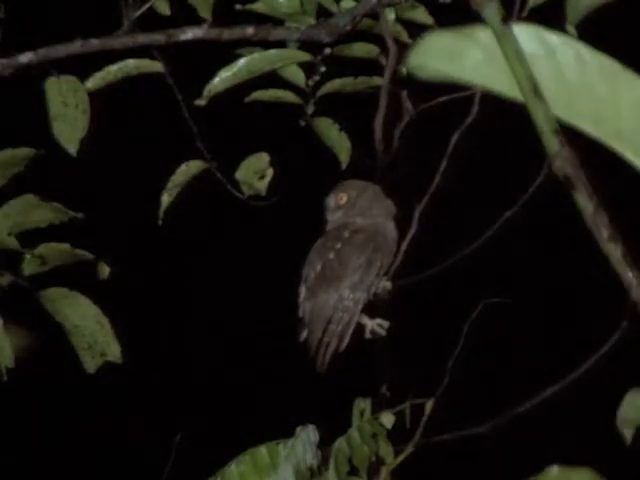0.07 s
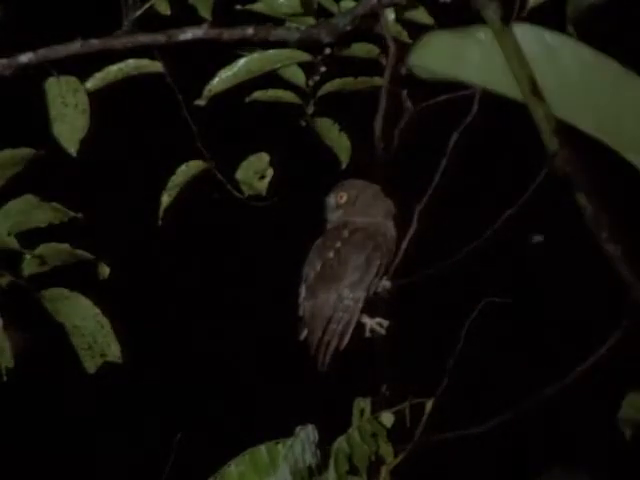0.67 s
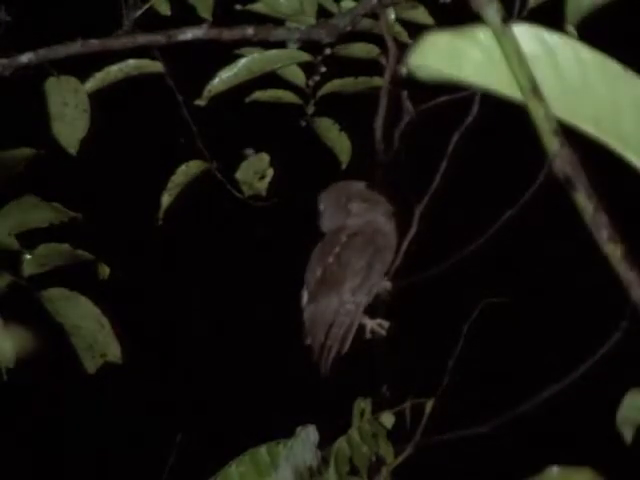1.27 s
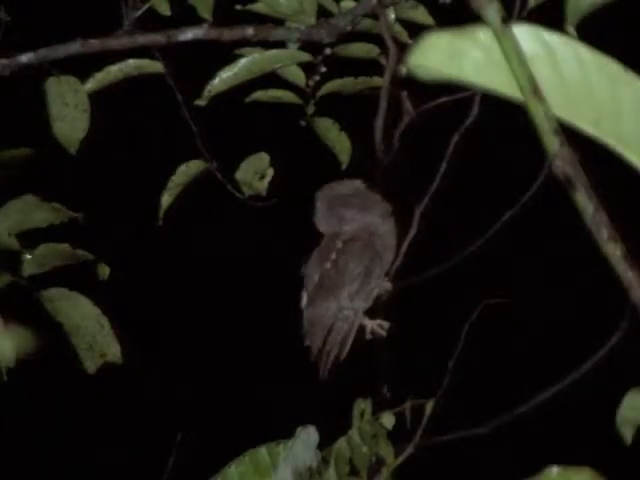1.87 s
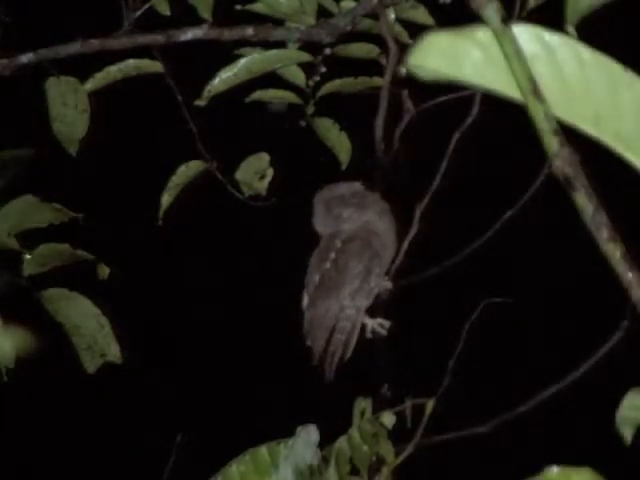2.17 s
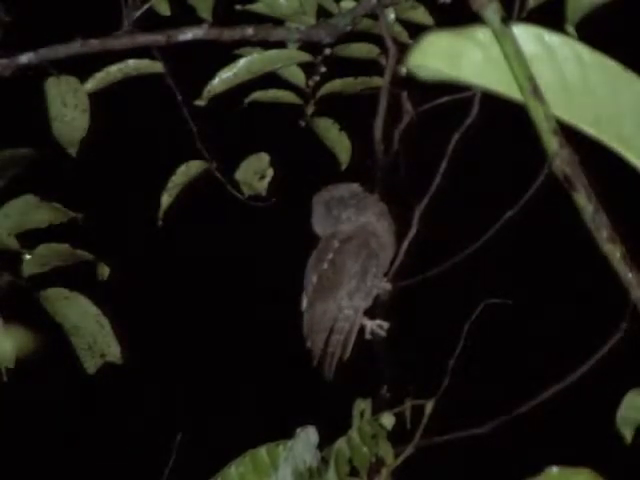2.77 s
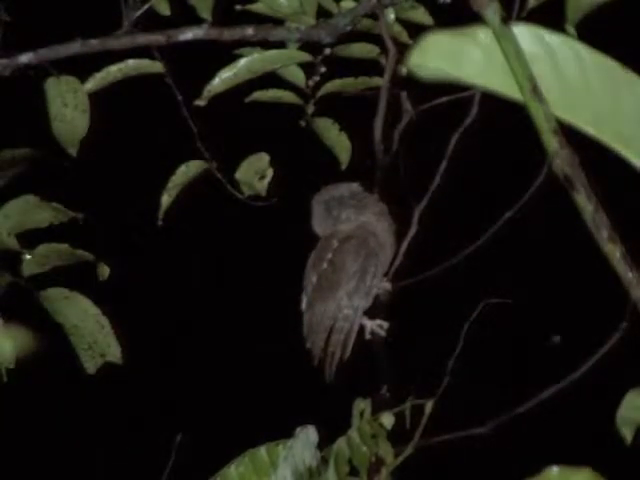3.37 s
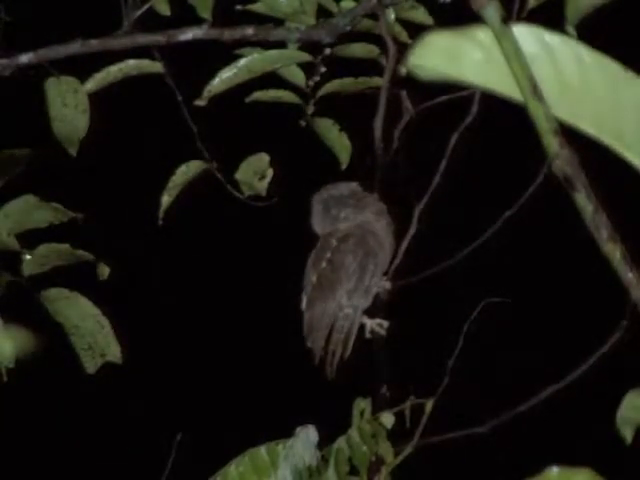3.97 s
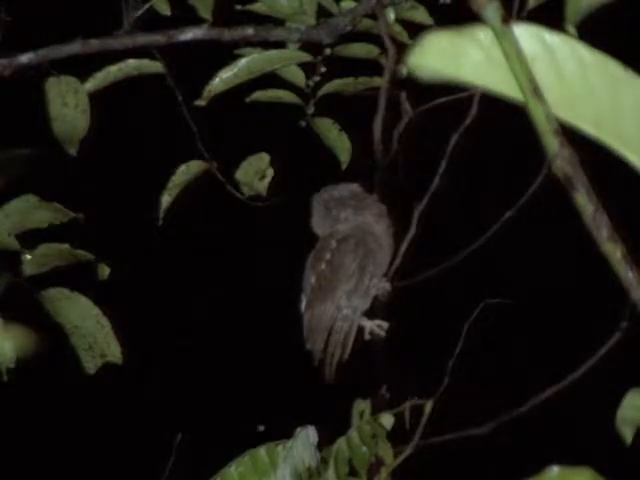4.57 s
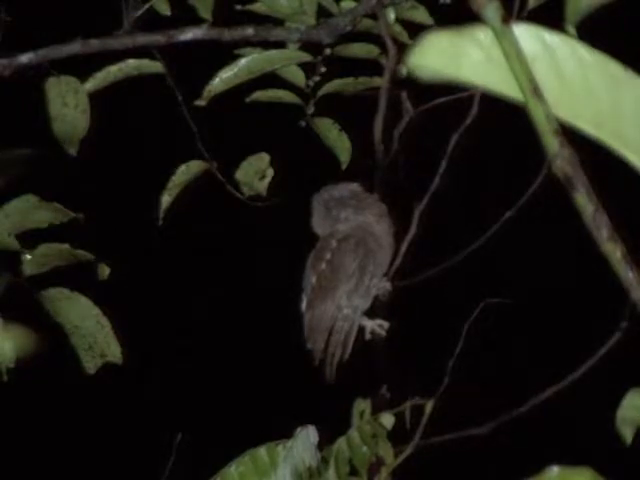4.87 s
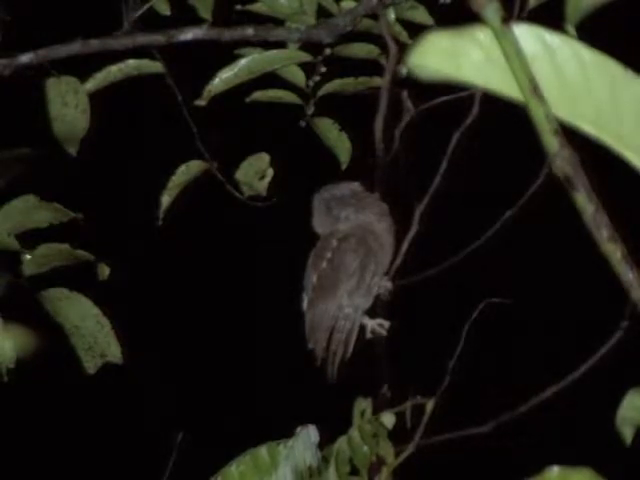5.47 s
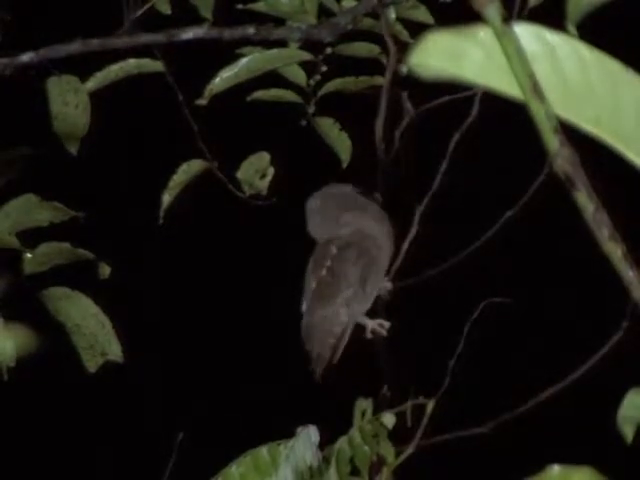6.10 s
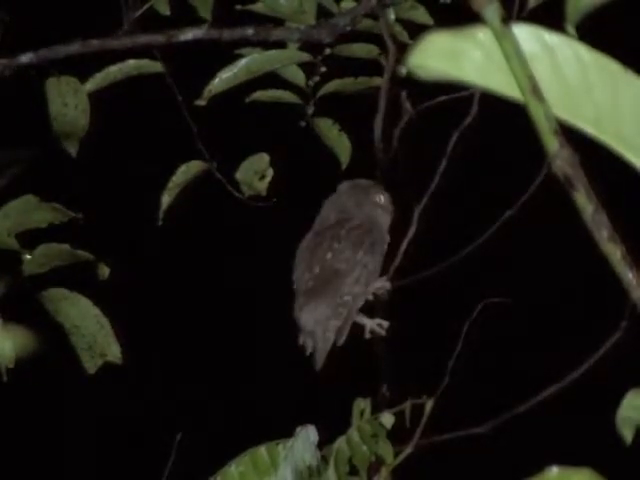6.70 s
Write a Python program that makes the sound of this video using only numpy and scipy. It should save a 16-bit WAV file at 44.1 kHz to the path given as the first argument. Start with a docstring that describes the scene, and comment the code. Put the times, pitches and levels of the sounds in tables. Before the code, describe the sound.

Night in a forest, with crickets trilling steadily on all sides of the microphone, higher crickets pulsing about twice a second and katydids buzzing above them. Thin tree cricket whistles come and go. Early on come a brief twig creak and two soft, distant animal calls; later a third call and a few dry twig ticks. Underneath lie a faint machine hum and a low distant rumble that grows a little toward the end.

```python
"""A forest at night. From the start, insects rub file on scraper to ring their wings: crickets trill near
5 kHz, higher ones purr in phrases near 7 kHz and katydids buzz near 9 kHz, over countless far neighbours,
a distant rumble and a faint machine hum. Soon leaves stir and tree crickets whistle on and off. A twig
creaks at 0.9 s, and a far animal calls softly at 1.5 s, 1.9 s and 4.8 s. From 4.7 s a few ticks sound in
the foliage, while the upper part of the rumble swells to a peak at 6.3 s."""
import sys
import numpy as np
from scipy import signal
from scipy.fft import rfft, irfft
from scipy.io import wavfile
from scipy.ndimage import uniform_filter1d

SR = 44100
rng = np.random.default_rng(int(sys.argv[2]) if len(sys.argv) > 2 else 0)


def wrap_up_sound(samples):
    """Save the sound to the file named by the first command line argument, as 16-bit audio."""
    columns = np.atleast_2d(samples).T
    # keep every value between -1 and 1, then stretch to whole-number steps
    tamed = np.clip(columns, -1, 1)
    steps = np.round(tamed * 32767).astype(np.int16)
    wavfile.write(sys.argv[1], SR, steps)


N = 297234

# spectra of the rumble, its swelling upper part and the leaves: (frequency [Hz], relative density [dB])
RUMBLE_SPECTRUM = [(20, -16), (42, -33), (65, -8), (110, -3.5), (150, 2.5), (185, -0.5), (270, -9),
                   (500, -13.5), (620, -11), (700, -16), (1400, -22.5), (3000, -30), (6500, -20),
                   (10500, -56), (12500, -70)]
SWELL_SPECTRUM = [(70, -25), (120, 17), (200, 11), (240, 16), (290, 13), (380, -55)]
LEAF_SPECTRUM = [(400, 8), (800, 5), (1300, 4.5), (2000, 4), (3000, -0.5), (5000, -14), (9000, -48)]
# likeness of the rumble at the two ears: (frequency [Hz], coherence [0-1])
RUMBLE_COHERENCE = [(60, 0.74), (170, 0.51), (300, 0.088), (600, 0.09), (1200, 0.027), (3000, 0.15),
                    (10000, .15)]
# balance of the rumble: (frequency [Hz], left minus right [dB])
RUMBLE_BALANCE = [(40, -1), (80, 10), (160, 3.5), (300, 0), (600, -2), (1200, -1.5), (3000, 1.5)]
# phase of the rumble between the ears: (frequency [Hz], lead of the left ear [rad])
RUMBLE_PHASE = [(40, 0.78), (130, 0.52), (260, -0.94), (950, -1.34), (1900, 0.037), (4000, -0.79)]
# tones of a far machine, and steady narrow lines within the cricket trills: (frequency [Hz], level [dB], left
# minus right [dB])
HUM_TONES = [(61.3, -73.5, 23), (74.7, -70.5, 14), (144.3, -64.5, 6), (363.4, -72, 5), (499, -74, -14),
             (595, -77, -7), (630, -66.5, -18)]
TRILL_LINES = [(4572, -64, -4), (4812, -54.5, -3.5), (4846, -59, 4), (4948, -58, 0), (5125, -55.5, 3),
               (5322, -56, 4), (5425, -55.5, 6), (5499, -59, 0), (5633, -60, -1), (5654, -62, 8),
               (5751, -63.5, -1)]
# rustles of leaves: (centre time [s], half length [s], relative level [dB])
LEAF_RUSTLES = [(0.362, 0.031, -66), (0.65, 0.34, -64.5), (0.666, 0.0051, -65), (0.922, 0.018, -60.5),
                (1.402, 0.12, -62.5), (1.72, 0.074, -66), (2.307, 0.28, -61), (2.47, 0.017, -72),
                (2.74, 0.04, -69), (3.498, 0.072, -62), (4.28, 0.034, -75), (4.76, 0.089, -60.5),
                (5.93, .04, -67), (6.42, 0.014, -60)]
# resonances of the creaking twig: (frequency [Hz], relative level [dB])
CREAK_MODES = [(1080, -8), (1490, 0), (1860, -8), (2450, -21)]
# its slips: (centre time [s], half length [s], pitch factor [ratio], level [dB])
CREAK_SLIPS = [(.903, .007, .99, -53), (.918, .006, .9, -53), (.935, .008, 1.01, -49.5)]
# resonances of a snapping twig: (frequency [Hz], bandwidth [Hz], relative level [dB])
TWIG_MODES = [(600, 400, -14), (1090, 430, -6), (1700, 430, -8), (2780, 420, -3), (3880, 900, -11)]
# snaps: (time [s], level [dB], ring frequency [Hz], time to decay by 60 dB [s], left minus right [dB])
TWIG_SNAPS = [(4.691, -38, 930, .024, 10), (4.742, -37, 1250, .016, 6), (5.158, -44, 1500, .016, -8),
              (5.162, -32.5, 2990, .024, 10), (5.165, -38, 1080, .02, 8), (5.175, -44, 1700, .016, 8),
              (5.932, -49, 2480, .03, -3), (6.414, -50, 1500, .03, -3)]
# calls of a far animal: (centre time [s], half length [s], pitch [Hz], glide [Hz/s], level [dB])
ANIMAL_CALLS = [(1.48, 0.1, 1262, -60, -57.5), (1.88, .17, 1275, 0, -65), (4.84, .1, 1335, 120, -57)]
# tree cricket notes: (start [s], end [s], pitch [Hz], level [dB], left minus right [dB])
TREE_CRICKET_NOTES = [(.8, 3.2, 3763, -68, 3), (.4, 3.1, 3806, -70.5, 3), (1.9, 3.2, 3994, -74, 2),
                      (1.6, 3.1, 4269, -66, 2), (1.7, 3.4, 4224, -68, 2), (2.1, 2.8, 4352, -66, 2),
                      (3.4, 4.7, 3915, -71, 2), (3.45, 4.35, 3994, -68.5, 2), (3.5, 4.4, 4272, -70, 2),
                      (3.5, 4.4, 4355, -69, 2), (5.4, 6.7, 3763, -67, 4), (5.6, 7, 3806, -72, 3)]
# spectra of the far insect choirs: (frequency [Hz], relative density [dB])
KATYDID_SPECTRUM = [(6800, -27), (7600, -18.5), (8150, -9.5), (8450, -0.5), (9050, 1), (9450, 1),
                    (9950, -9.5), (10400, -12), (10900, -16.5), (11400, -25), (12000, -84)]
TRILL_SPECTRUM = [(3300, -29), (3800, -20.5), (4150, -19.5), (4550, -11.5), (4850, -3.5), (5150, -1),
                  (5400, 1), (5600, -8), (5800, -9.5), (6000, -17.5), (6300, -26), (6700, -34), (8000, -83)]
HIGH_SPECTRUM = [(5000, -63), (6200, -33), (6500, -16), (6680, -7), (6790, 0), (6850, 2), (6910, 9.5),
                 (7030, 9), (7120, 12), (7220, -13), (7300, -7), (7350, -13), (7500, -21), (7900, -22),
                 (9000, -80)]
# single insects: (wing resonance [Hz], stroke rate [1/s], rise time constant [s], relative level [dB],
# left minus right [dB], rms phase slip of a stroke [cycles])
KATYDID_WINGS = [(9070, 171, 0.00061, -50.5, 4.3, 0.46), (9360, 210, 0.00053, -58, 2.9, 0.17)]
TRILL_WINGS = [(4932, 119.8, .0009, -47.5, -3, .015), (5308, 115.7, .0005, -44.5, 4, .015),
               (5162.5, 117.6, .001, -46.5, 3, .02), (5070, 141, .0014, -51, -3, .04),
               (5184, 148, .001, -48.5, -2, .05), (5028, 104, .0014, -49.5, -1.5, .02),
               (5517, 116.8, .0008, -53, -2, .02), (5364, 126, .0009, -52, -1, .12),
               (5083, 133, .0012, -50.5, -3, .03)]
NEIGHBOUR_WINGS = [(7005, 44.5, .002, -46, 2, .3), (6895, 51, .0025, -46.5, 1, .25)]
HIGH_WINGS = [(7042, 46.8, .0032, -38, 3, .15), (7148, 48.2, .0036, -37.6, -.5, .11),
              (7268, 43, .004, -48.5, 7, .3)]
# phrases of the three high crickets, one list each: (start [s], end [s])
HIGH_PHRASE_TIMES = [
    [(-.1, .31), (.43, .88), (1.02, 1.38), (1.56, 1.95), (2.08, 2.52), (2.7, 3.06), (3.25, 3.68),
     (3.93, 4.42), (4.53, 5.06), (5.19, 5.67), (5.77, 6.2), (6.3, 6.85)],
    [(.04, .45), (.61, 1.02), (1.15, 1.45), (1.56, 1.96), (2.11, 2.5), (2.66, 3.0), (3.19, 3.61),
     (3.76, 4.14), (4.29, 4.66), (4.8, 5.2), (5.37, 5.77), (5.92, 6.3), (6.46, 6.85)],
    [(-.1, .2), (.31, .64), (.83, 1.17), (1.32, 1.68), (1.83, 2.17), (2.35, 2.7), (2.87, 3.2), (3.4, 3.72),
     (3.89, 4.25), (4.41, 4.74), (4.94, 5.28), (5.42, 5.75), (5.97, 6.31), (6.47, 6.85)],
]

RUMBLE_DB, RUMBLE_RISE_DB_PER_S = -46.5, 0.2056
SWELL_PEAK_S, SWELL_HALF_S, SWELL_DB = 6.27, 1.18, -55
CREAK_WIDTH_HZ, RING_OVER_CRACK_DB = 110, -2
CALL_WANDER_HZ, CALL_WET_DB = 46.1, -1
PHRASE_FADE_S, PHRASE_ARCH_HZ = 0.059, 24
CUTOFF_HZ = 14600


def amp(db):
    """Amplitude ratio of a level in decibels."""
    return 10 ** (np.asarray(db) / 20)


def unit_rms(x):
    """Normalisation to an rms of 1."""
    return x / np.sqrt(np.mean(x ** 2) + 1e-20)


def log_interp(points, hz):
    """Interpolation of a table on a log-frequency axis."""
    f, value = np.transpose(points)
    return np.interp(np.log(hz + 1), np.log(f + 1), value)


def pan(db):
    """Left and right gains for an interaural level difference."""
    return amp(np.array([[.5], [-.5]]) * db)


def bell(centre_s, half_s):
    """Gaussian envelope of height 1."""
    return np.exp(-((np.arange(N) / SR - centre_s) / half_s) ** 2 / 2)


def drift(rate_hz):
    """Random fluctuation: low-passed noise of rms 1."""
    hz = np.fft.rfftfreq(N, 1 / SR)
    return unit_rms(irfft(rfft(rng.standard_normal(N)) * np.exp(-(hz / rate_hz) ** 2), N))


def cycles(hz):
    """Phase in cycles: the integral of frequency, from a random start."""
    return np.cumsum(hz) / SR + rng.random()


def resonance(hz, centre_hz, width_hz):
    """Lorentzian response of a damped mode."""
    return 1 / (1 + (2 * (hz - centre_hz) / width_hz) ** 2)


def diffuse(spectrum, coherence, pan_db, lead_rad=0, ragged_db=0):
    """Superposition: countless far sources sum to noise that is partly coherent between the ears."""
    hz = np.fft.rfftfreq(N, 1 / SR)
    shared, separate = rfft(rng.standard_normal((2, N)))
    left = shared * np.exp(1j * lead_rad)
    right = coherence * shared + np.sqrt(1 - coherence ** 2) * separate
    # sources that hold their pitch stand out as narrow peaks
    peaks = np.tanh(unit_rms(uniform_filter1d(rng.standard_normal(len(hz)), size=80)))
    colour = amp(log_interp(spectrum, hz) + ragged_db * peaks)
    return unit_rms(irfft(np.array([left, right]) * colour * pan(pan_db), N))


def forest(x, wet_db, t60=0.61):
    """Scattering by trunks and leaves gives each ear its own decaying tail; total power is kept."""
    t = np.arange(SR // 2) / SR
    tail = rng.standard_normal((2, len(t))) * amp(-60 * t / t60) * (t > .003)
    tail /= np.linalg.norm(tail, axis=1, keepdims=True)
    heard = x + amp(wet_db) * signal.fftconvolve(x, tail, axes=1)[:, :N]
    return heard * x.std(axis=1, keepdims=True) / heard.std(axis=1, keepdims=True)


def far_tones(rows, wander_hz, waver_db):
    """Fading: the level of a steady far tone wavers on the way to each ear."""
    out = np.zeros((2, N))
    for hz, db, pan_db in rows:
        tone = np.sin(2 * np.pi * cycles(hz + wander_hz * drift(8.6)))
        fading = amp(waver_db * np.array([drift(4.6), drift(0.56)]))
        out += pan(pan_db) * amp(db) * unit_rms(tone * fading)
    return out


def distant_rumble():
    """A diffuse field of low noise grows slowly, and its upper part swells late."""
    hz = np.fft.rfftfreq(N, 1 / SR)
    rumble = diffuse(RUMBLE_SPECTRUM, coherence=log_interp(RUMBLE_COHERENCE, hz),
                     pan_db=log_interp(RUMBLE_BALANCE, hz), lead_rad=log_interp(RUMBLE_PHASE, hz))
    level_db = RUMBLE_DB + RUMBLE_RISE_DB_PER_S * np.arange(N) / SR
    swell = amp(SWELL_DB) * bell(SWELL_PEAK_S, SWELL_HALF_S)
    return amp(level_db) * rumble + swell * diffuse(SWELL_SPECTRUM, coherence=0.35, pan_db=2.0)


def machine_hum():
    """A far machine radiates a line spectrum of faint low tones."""
    return far_tones(HUM_TONES, wander_hz=1.5, waver_db=1.2)


def leaves():
    """Friction noise: leaves brush together in soft, grainy swells."""
    stir = sum(amp(db) * bell(centre_s, half_s) for centre_s, half_s, db in LEAF_RUSTLES)
    grain = amp(1.5 * drift(110))
    return amp(8.5) * stir * diffuse(LEAF_SPECTRUM, coherence=0.54, pan_db=-2.0) * grain


def twig_creak():
    """Stick-slip friction: each slip of a bending twig excites its modes at a slightly different pitch."""
    hz, out = np.fft.rfftfreq(N, 1 / SR), np.zeros(N)
    for centre_s, half_s, pitch, db in CREAK_SLIPS:
        body = sum(amp(mode_db) * resonance(hz, f * pitch, CREAK_WIDTH_HZ) for f, mode_db in CREAK_MODES)
        rasp = unit_rms(irfft(rfft(rng.standard_normal(N)) * body, N))
        out += amp(db) * bell(centre_s, half_s) * rasp
    return forest(pan(2) * out, wet_db=0, t60=0.22)


def twig_ticks():
    """Impulsive excitation: a small dry snap gives a woody crack and one damped ring of the twig."""
    out, t = np.zeros((2, N)), np.arange(SR // 4) / SR
    hz = np.fft.rfftfreq(len(t), 1 / SR)
    body = sum(amp(db) * resonance(hz, f, width_hz) for f, width_hz, db in TWIG_MODES)
    for start_s, db, ring_hz, t60, pan_db in TWIG_SNAPS:
        colour = body / (1 + (np.log2((hz + 1) / ring_hz) / .8) ** 4)  # strongest near the ring
        shared, left, right = irfft(rfft(rng.standard_normal((3, len(t)))) * colour, len(t))
        crack = unit_rms(shared + 0.5 * np.array([left, right]))
        ring = amp(RING_OVER_CRACK_DB) * unit_rms(np.sin(2 * np.pi * ring_hz * t))
        envelope = amp(-60 * t / t60) * (1 - np.exp(-t / 0.0006))
        snap = amp(db) * pan(pan_db) * unit_rms(crack + ring) * envelope
        span = out[:, round(start_s * SR):][:, :len(t)]
        span += snap[:, :span.shape[1]]
    return out


def far_animal():
    """Reverberation among the trees blurs soft held notes that waver and glide a little."""
    t, out = np.arange(N) / SR, np.zeros((2, N))
    for centre_s, half_s, hz, glide, db in ANIMAL_CALLS:
        pitch = hz + glide * (t - centre_s) + CALL_WANDER_HZ * drift(41.9)
        out += amp(db) * bell(centre_s, half_s) * unit_rms(np.sin(2 * np.pi * cycles(pitch)))
    return forest(out, wet_db=CALL_WET_DB, t60=0.9)


def tree_crickets():
    """Nearly sinusoidal notes fade in and out below the pitch of the main chorus."""
    t, out = np.arange(N) / SR, np.zeros((2, N))
    for start, end, *voice in TREE_CRICKET_NOTES:
        singing = np.clip(np.minimum(t - start, end - t) / 0.14, 0, 1)
        out += singing * far_tones([voice], wander_hz=2, waver_db=2)
    return out


def stridulation(rows, rate_jitter, wander_hz, flutter_db, bend_hz=0):
    """Driven resonance: each stroke drags the file over the scraper and briefly rings the wing."""
    out = np.zeros((2, N))
    for hz, rate, rise_s, db, pan_db, slip in rows:
        strokes = cycles(rate * (1 + rate_jitter * drift(4.46)))
        progress = strokes % 1
        age_s = progress / rate
        release = (1 - progress ** 6) ** 2  # silent before the next stroke
        envelope = (age_s / rise_s) ** 2 * np.exp(-age_s / rise_s) * release
        # no two strokes catch the file at quite the same place, or with the same force
        catch, force = rng.standard_normal((2, N))[:, strokes.astype(int)]
        pitch = hz + bend_hz + wander_hz * drift(4)
        wing = np.sin(2 * np.pi * (cycles(pitch) + slip * catch))
        out += pan(pan_db) * amp(db) * unit_rms(envelope * wing * amp(flutter_db * force))
    return out


def katydids():
    """Spectral broadening: short, irregular strokes make a rasping buzz at the top of the chorus."""
    wings = stridulation(KATYDID_WINGS, rate_jitter=0.0071, wander_hz=60.4, flutter_db=3.5)
    near = forest(wings, wet_db=19.0)
    choir = diffuse(KATYDID_SPECTRUM, coherence=0.34, pan_db=0.2)
    return near + amp(-45.5) * choir * amp(0.61 * drift(24))


def trilling_crickets():
    """Amplitude modulation: fast strokes make unbroken trills; moving air makes the far ones shimmer."""
    wings = stridulation(TRILL_WINGS, rate_jitter=.003, wander_hz=2.8, flutter_db=1.5)
    near = amp(-1.4) * forest(wings, wet_db=-4.5)
    choir = diffuse(TRILL_SPECTRUM, coherence=0.3, pan_db=0.7, ragged_db=2)
    far = amp(-39.5) * choir * amp(.9 * drift(22))
    return near + far + far_tones(TRILL_LINES, wander_hz=2.5, waver_db=3)


def high_crickets():
    """Slower stridulation: three crickets purr in phrases that arch in pitch, over steady far ones."""
    t, near = np.arange(N) / SR, np.zeros((2, N))
    for voice, phrases in zip(HIGH_WINGS, HIGH_PHRASE_TIMES):
        singing, arch = np.zeros((2, N))
        for start, end in phrases:
            singing += np.clip(np.minimum(t - start, end - t) / PHRASE_FADE_S + .5, 0, 1)
            arch += np.sin(np.pi * np.clip((t - start) / (end - start), 0, 1))
        bend = PHRASE_ARCH_HZ * (arch - 2 / np.pi)  # zero mean over a phrase
        near += singing * stridulation([voice], rate_jitter=.03, wander_hz=7, flutter_db=.7, bend_hz=bend)
    wings = stridulation(NEIGHBOUR_WINGS, rate_jitter=.016, wander_hz=12, flutter_db=1)
    neighbours = forest(wings, wet_db=1.5)
    far = amp(-40.5) * diffuse(HIGH_SPECTRUM, coherence=0.11, pan_db=1.5)
    song = forest(near, wet_db=2, t60=.22) + neighbours + far
    # squaring doubles the frequency: a trace of the wing's octave
    octave = signal.sosfilt(signal.butter(4, 10000, "high", fs=SR, output="sos"), song ** 2)
    return song + amp(-79.0) * unit_rms(octave)


def scene():
    """Linear superposition of all the voices of the night."""
    insects = trilling_crickets() + high_crickets() + katydids() + tree_crickets()
    return insects + distant_rumble() + machine_hum() + leaves() + twig_ticks() + twig_creak() + far_animal()


def record(dry):
    """Band limiting by a linear-phase low-pass filter."""
    lowpass = signal.firwin(511, CUTOFF_HZ, window=("kaiser", 9), fs=SR)
    return signal.oaconvolve(dry, lowpass[None], "same")


dry = scene()
out = record(dry)
wrap_up_sound(out)
```